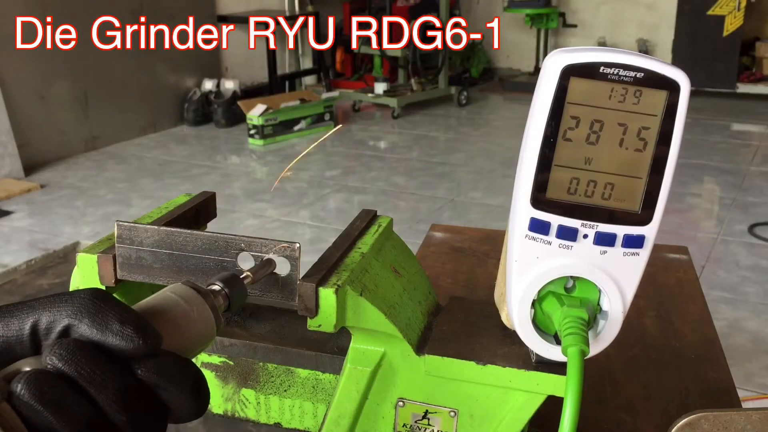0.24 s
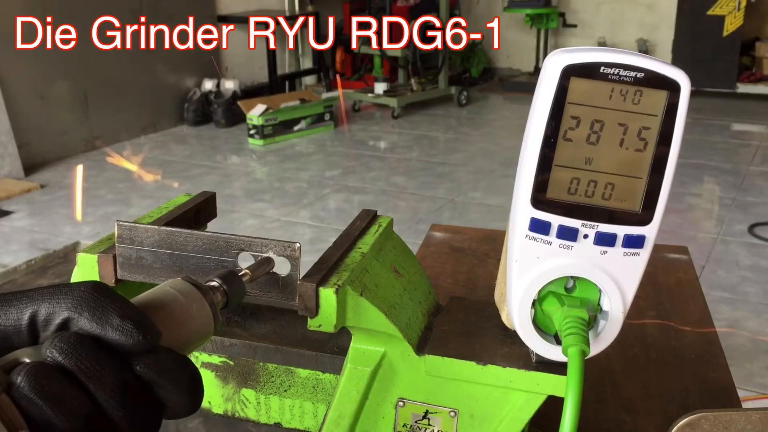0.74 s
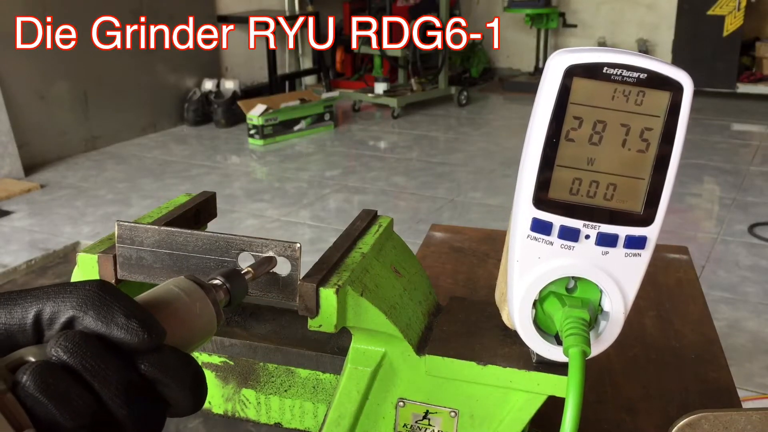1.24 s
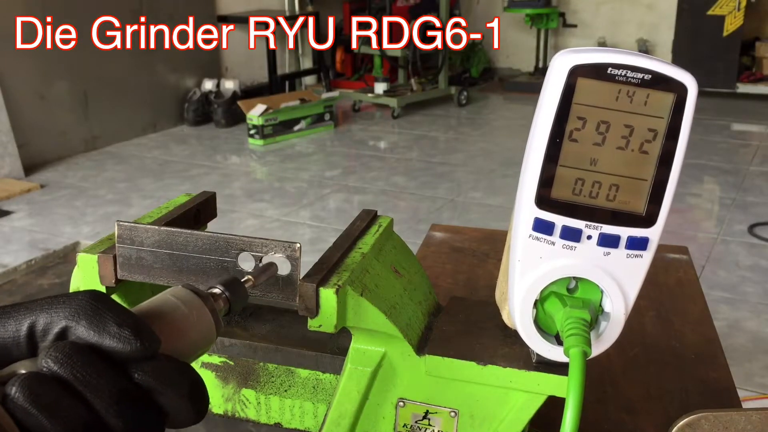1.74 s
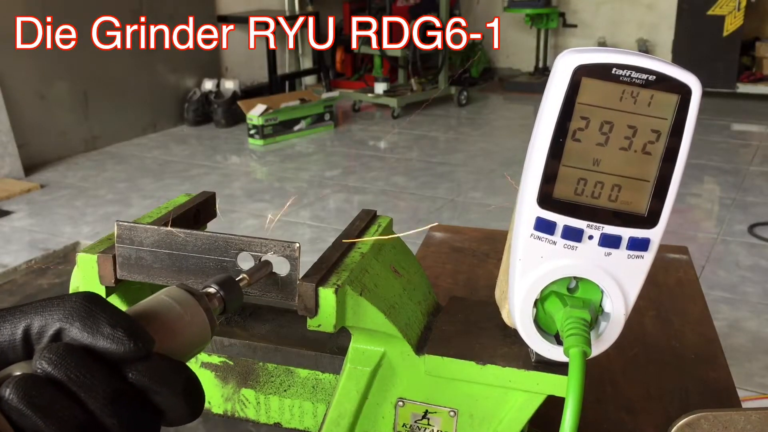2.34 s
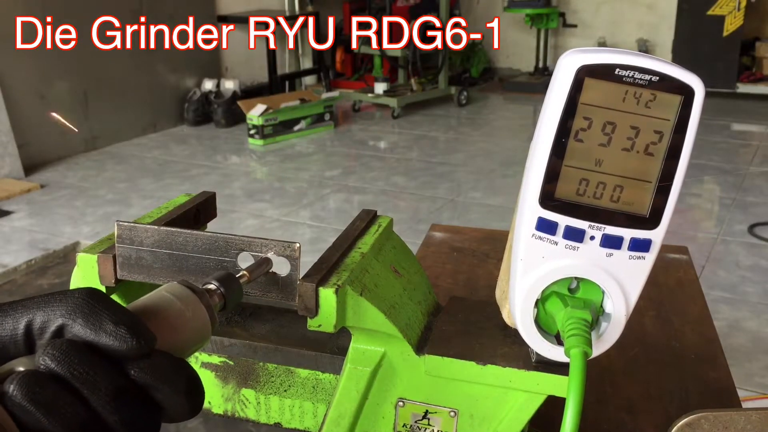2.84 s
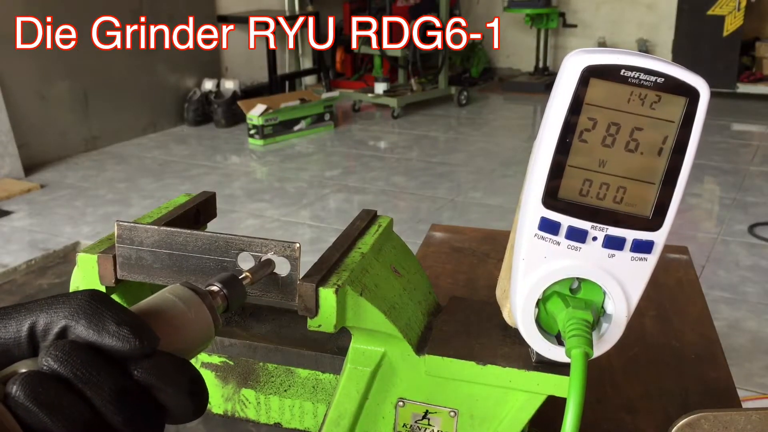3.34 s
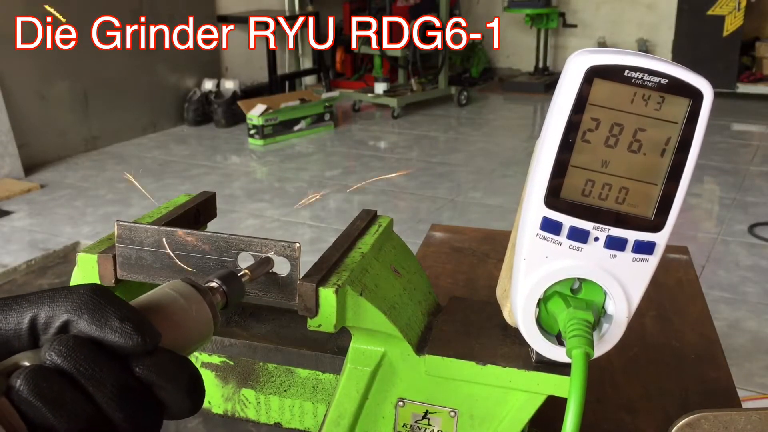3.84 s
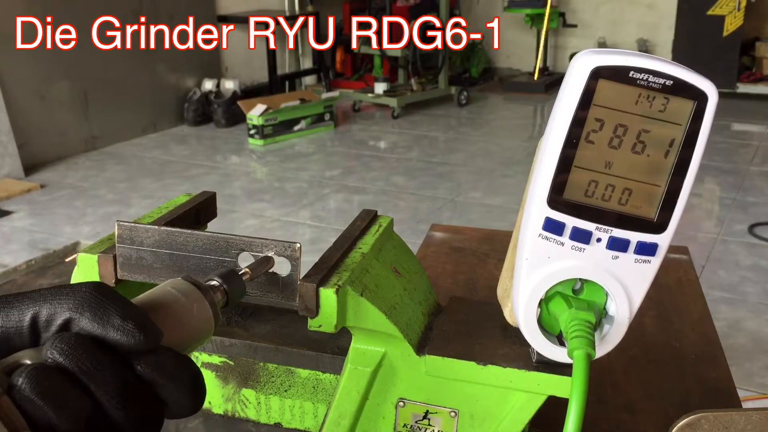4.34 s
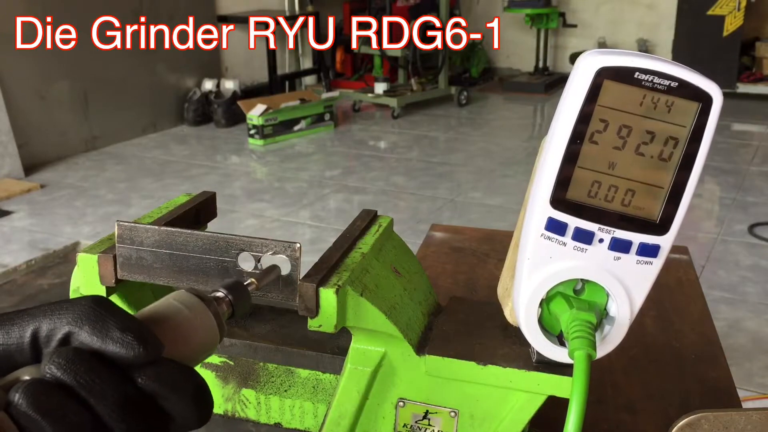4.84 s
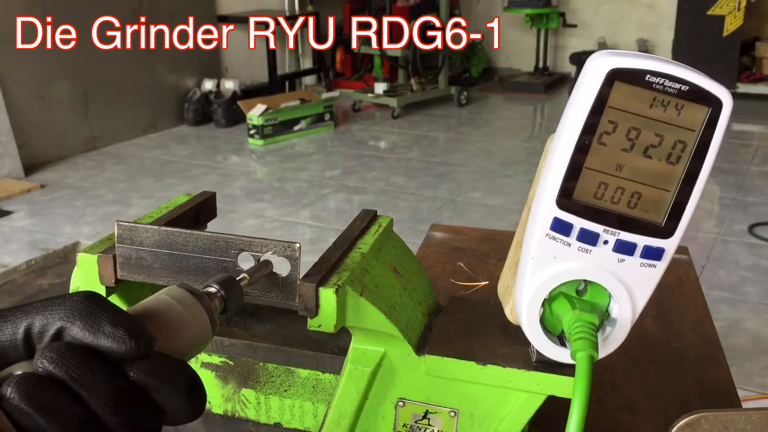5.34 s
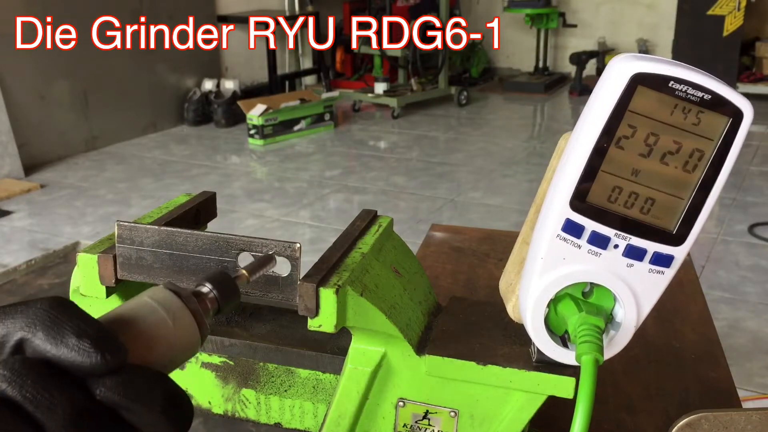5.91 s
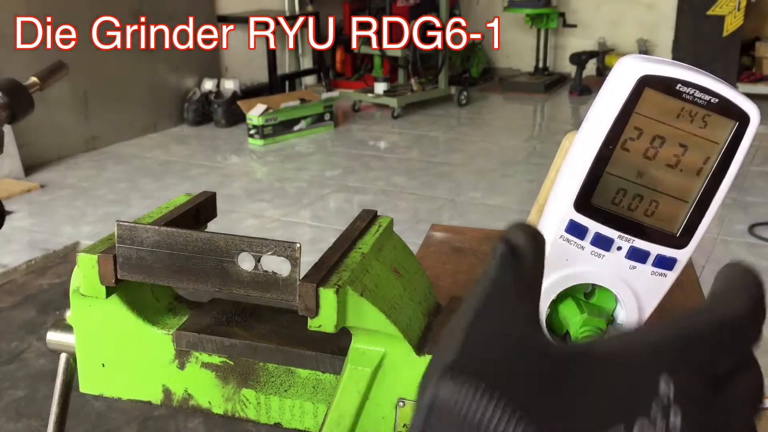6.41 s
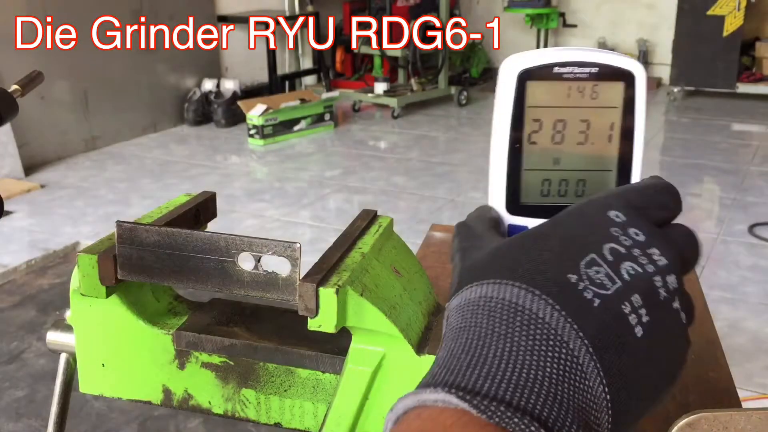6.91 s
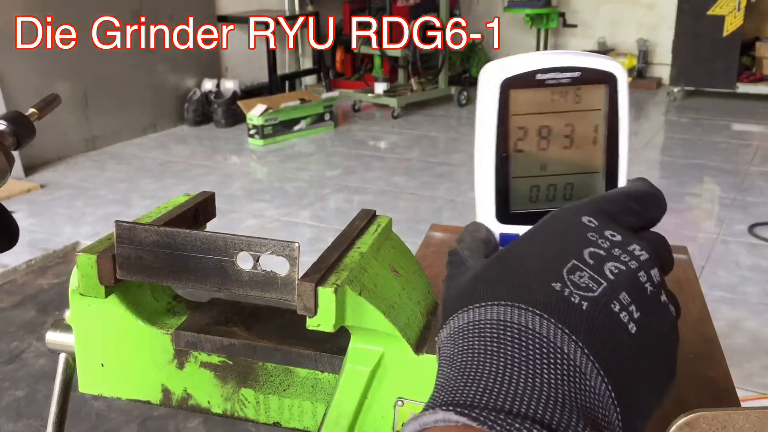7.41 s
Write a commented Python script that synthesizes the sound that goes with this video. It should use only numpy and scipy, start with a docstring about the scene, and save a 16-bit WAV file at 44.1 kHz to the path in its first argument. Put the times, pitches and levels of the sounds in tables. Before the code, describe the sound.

Close in a workshop, an electric die grinder whirs steadily while its burr grinds a steel plate in a vice. Three passes of harsh buzz, gritty hiss and metallic squeal are separated by brief free-running gaps; the pitch sags under pressure and rises when released. After about six seconds it is switched off, and the airy whine glides down, duller and quieter, still turning at the end.

```python
"""Die grinder on steel plate

An electric die grinder bites into a steel plate held in a vice, three times, then is switched off
and coasts down. The rotor hums once a turn, a ball bearing sings beside the shaft's orders and the
fan hisses. The burr knocks the plate every turn, rings its modes with grit, rattles its low modes
and thumps the bench; pressed hard, it whirls round the hole. One microphone."""
import sys
import numpy as np
from scipy import signal
from scipy.fft import rfft, irfft, next_fast_len
from scipy.io import wavfile
from scipy.ndimage import uniform_filter1d, map_coordinates

SR = 44100
rng = np.random.default_rng(int(sys.argv[2]) if len(sys.argv) > 2 else 0)


def wrap_up_sound(samples):
    """Save the sound to the file named by the first command line argument, as 16-bit audio."""
    columns = np.atleast_2d(samples).T
    # keep every value between -1 and 1, then stretch to whole-number steps
    tamed = np.clip(columns, -1, 1)
    steps = np.round(tamed * 32767).astype(np.int16)
    wavfile.write(sys.argv[1], SR, steps)


N = 337806


def amp(db):
    """Decibels to gain."""
    return np.exp(np.asarray(db) * (np.log(10) / 20))


def unit(x):
    """x scaled to rms 1."""
    return x / np.sqrt(np.mean(x ** 2) + 1e-20)


def curves(rows, outside=None):
    """One value per sample for each column after the time."""
    knots_s, *columns = np.transpose(rows)
    return np.array([np.interp(np.arange(N) / SR, knots_s, c, outside, outside) for c in columns])


def passes(tables):
    """Gains of dB tables, one table a contact, silent in between."""
    return sum(amp(curves(rows, outside=-200)) for rows in tables)


def wobble(rate_hz, depth_db=None):
    """Smooth random curve of rate_hz knots; with depth_db, the gain that it gives."""
    coarse = np.arange(0, N + 32, 32)
    knots = rng.standard_normal(int(N * rate_hz / SR) + 4)
    smooth = map_coordinates(knots, [coarse * rate_hz / SR])
    return np.interp(np.arange(N), coarse, smooth if depth_db is None else amp(depth_db * smooth))


def filtered(x, response):
    """x times a complex response of frequency."""
    m = next_fast_len(N + SR // 2)
    return irfft(rfft(x, m) * response(np.fft.rfftfreq(m, 1 / SR)), m)[..., :N]


def coloured(points):
    """Response through (freq_hz, level_db) points on a log axis."""
    freq_hz, level_db = np.transpose(points)
    log_hz = np.log(freq_hz + 1)
    return lambda hz: amp(np.interp(np.log(hz + 1), log_hz, level_db, -120, -120))


def resonant(modes, between_db):
    """Response of modes, alternating in sign, over a flat path."""
    def response(hz):
        total = amp(between_db)
        for k, (mode_hz, width_hz, level_db) in enumerate(modes):
            damping = 1j * hz * width_hz
            total = total + (-1) ** k * amp(level_db) * damping / (mode_hz ** 2 - hz ** 2 + damping)
        return total
    return response


def high_pass(hz, edge_hz):
    """First-order high-pass response."""
    return 1j * hz / (edge_hz + 1j * hz)


def line(multiple, turns, waver_db, rate_hz=12):
    """Sine locked to the shaft angle, its strength wavering at rate_hz knots."""
    cycle = ((multiple * turns + rng.random()) % 1).astype(np.float32)
    return np.sqrt(2) * unit(wobble(rate_hz, waver_db)) * np.sin(np.float32(2 * np.pi) * cycle)


def patchy(x, depth_db, size):
    """x with random gain patches, size = (bands, frames): the hand keeps shifting the tool."""
    z = signal.stft(x, nperseg=512)[2]
    field = uniform_filter1d(rng.standard_normal(z.shape), size[0], 0)
    field = uniform_filter1d(field, size[1], 1)
    return signal.istft(z * amp(depth_db * unit(field)), nperseg=512)[1][:N]


ROOM_DB = -64  # rms
# workshop and microphone hiss: freq_hz, level_db (per Hz)
ROOM_HISS = [(18, -6), (100, -6), (600, -2), (5000, -19), (15700, 9)]


def room():
    """Steady coloured noise of workshop and microphone."""
    return amp(ROOM_DB) * unit(filtered(rng.standard_normal(N), coloured(ROOM_HISS)))


# shaft speed under power, sagging under load: start_s, speed_hz
SHAFT_SPEED = [(0.0, 537.0), (0.22, 540.0), (0.5, 535.5), (1.0, 516.5), (1.25, 512.3), (1.42, 513.5),
               (1.75, 537), (2.0, 550), (2.17, 553), (2.4, 545.5), (2.93, 526.5), (3.45, 539.5),
               (3.65, 537), (4.1, 526), (4.43, 522.3), (4.8, 544.5), (5.05, 555.5), (5.27, 561.3),
               (5.68, 551.8), (6.05, 564), (6.2, 566)]
ROUNDING_S = 0.16
OFF_S, COAST_S, FIRST_DROP, FIRST_DROP_S = 6.115, 3.13, 0.014, 0.13  # FIRST_DROP is a fraction


def shaft():
    """Turns a second: load curve rounded by the rotor's inertia, then an exponential coast."""
    coast_s = np.maximum(np.arange(N) / SR - OFF_S, 0)
    powered = uniform_filter1d(curves(SHAFT_SPEED)[0], int(ROUNDING_S * SR), mode="nearest")
    drop = 1 - FIRST_DROP * (1 - np.exp(-coast_s / FIRST_DROP_S))
    return powered * np.exp(-coast_s / COAST_S) * drop


# tool turned away from the microphone: start_s, away (0-1)
TURNED_AWAY = [(0, 0), (6.2, 0.03), (6.6, 0.49), (7.1, 0.44)]


def turned_away():
    """How far the tool is turned away, 0 to 1."""
    return curves(TURNED_AWAY)[0]


# fan noise facing the microphone: freq_hz, level_db (per Hz)
FAN_NEAR = [(18, -67), (30, -30), (482, -27), (535, -14), (643, -23), (1110, -5), (1240, -7), (1650, -7.5),
            (2510, -9), (2790, -8), (3620, -13), (6440, -6.5), (8160, -13.5), (12100, -9.5), (15700, -16.5)]
# fan noise turned away: freq_hz, level_db (per Hz)
FAN_AWAY = [(18, -55), (30, -4), (325, -21), (391, -12.5), (457, -12), (977, -16), (1140, -9.5),
            (1490, -5.5), (1930, -5.5), (3260, -22), (4130, -6), (6440, -12.5), (7540, -16.5), (9300, 2),
            (15700, -0.5)]
# slow rise of the fan noise before and during the coast: start_s, gain_db
AIR_RISE = [(5.8, -0.5), (6.1, -0.5), (6.25, 1.2), (6.6, 1.5), (7, 2)]
AIR_DB, AIR_POWER, AWAY_LOSS_DB = -35, 2.21, -4.5  # at full speed, growth with speed, loss turned away
NOTCH_HZ, NOTCH_WIDTH_HZ = 7500, 370


def fan_air(pace, turns, away):
    """Turbulent noise that throbs with the turn and dulls as the blades slow."""
    rush = patchy(rng.standard_normal(N), depth_db=2.0, size=(6, 20))
    rush *= (1 + 0.25 * np.sin(2 * np.pi * turns)) * wobble(30, depth_db=0.43)
    near = unit(filtered(rush, coloured(FAN_NEAR)))
    far = unit(filtered(rush, coloured(FAN_AWAY)))
    air = (1 - away) * near + away * far
    treble = filtered(air, lambda hz: 1 / (1 + (10000 / (hz + 1)) ** 8))
    air -= treble * (1 - pace ** 7.2)  # treble fades faster than the rest
    # bench-top reflection cancels this band once the tool is turned away
    band = filtered(air, lambda hz: np.exp(-((hz - NOTCH_HZ) / NOTCH_WIDTH_HZ) ** 2))
    air -= 1.3 * away * band
    level_db = AIR_DB + curves(AIR_RISE)[0] + AWAY_LOSS_DB * away
    return amp(level_db) * pace ** AIR_POWER * air


# rotor unbalance, once a turn: start_s, level_db
ROTOR_HUM = [(0, -45.5), (.7, -47), (1, -40), (1.23, -43), (1.73, -48), (1.94, -44), (2.39, -44.5),
             (2.92, -47), (3.22, -49), (3.39, -45.5), (3.99, -47), (4.31, -43), (4.63, -48.5),
             (4.91, -43.5), (5.2, -44), (5.7, -46), (5.89, -41.5), (6.06, -46.5), (6.17, -42.5),
             (6.31, -47), (6.85, -47.5), (7.21, -53), (7.36, -63), (7.66, -65)]


def rotor_hum(turns, away):
    """Unbalance shakes the housing once a turn."""
    unsteady = amp(1.5 * away * wobble(14))
    return amp(curves(ROTOR_HUM)[0]) * unsteady * line(1, turns, waver_db=0.68)


# motor whine ahead of the housing, one value per order 2 to 7: level_db
WHINE_DB = [-55, -52.5, -47, -54.5, -54, -55]
# power share of the bearing line near each order 2 to 7: share (0-1)
BALL_SHARE = [.75, .35, .5, .7, .6, .5]
# fade and swell of order 4 in the coast: start_s, gain_db
FOURTH_ORDER = [(6.3, -4), (6.6, -7), (6.8, -6), (7.05, 2), (7.3, -20), (7.46, -6), (7.56, 1), (7.64, 4)]
# housing modes: freq_hz, width_hz, level_db
HOUSING_MODES = [(1033, 76, 1), (1143, 33, 8.5), (1374, 75, 6.5), (1570, 100, 7.5), (1990, 146, 1.5),
                 (2505, 90, 7.5), (2782, 53, 5)]
BALL_PASS = 3.06  # balls passing a point of the race per turn
WHINE_POWER = 1.94  # growth with speed


def bearing_whine(pace, turns, away):
    """Shaft orders, each beating with a bearing line 0.06 of the turn rate above, via the housing."""
    whine = 0
    for order, (level_db, share) in enumerate(zip(WHINE_DB, BALL_SHARE), start=2):
        ball = line(BALL_PASS + order - 3, turns, waver_db=4.5)
        whole = line(order, turns, waver_db=0.4)
        if order == 4:
            level_db = level_db + curves(FOURTH_ORDER)[0]
        whine += amp(level_db) * (np.sqrt(1 - share) * whole + np.sqrt(share) * ball)
    housed = filtered(whine, resonant(HOUSING_MODES, between_db=-4))
    return amp(-3 * away) * pace ** WHINE_POWER * housed


# 12 rotor slots: start_s, level_db
ROTOR_SLOTS = [(0, -62), (5.9, -61), (6.15, -55), (6.45, -57), (6.65, -57), (6.8, -68), (7.66, -75)]
# 24 commutator bars: start_s, level_db
COMMUTATOR_BARS = [(6.5, -74), (6.8, -64), (7.2, -67), (7.66, -72)]


def slots_and_bars(turns):
    """Rotor slots and commutator bars each give a line at their count per turn."""
    slots = amp(curves(ROTOR_SLOTS)[0]) * line(12, turns, waver_db=4, rate_hz=25)
    return slots + amp(curves(COMMUTATOR_BARS)[0]) * line(24, turns, waver_db=1.5, rate_hz=27)


MAINS_RIPPLE_HZ = 100


def mains_cycles():
    """Phase of the mains torque ripple in cycles."""
    return MAINS_RIPPLE_HZ * np.arange(N) / SR


# burr strike, one table a pass: start_s, level_db, bright_db (upper orders over the lowest two)
KNOCK_FIRMNESS = [
    [(0, -41.5, -2.5), (.25, -39.5, -4), (.5, -40.5, -2), (.8, -37.5, -1.5), (1.15, -38.5, 0),
     (1.35, -43.5, 11), (1.52, -47.5, 4)],
    [(2.03, -56, 0), (2.15, -41.5, -4), (2.4, -41.5, -6.5), (2.6, -40.5, -6.5), (2.9, -42, 0.5),
     (3.3, -42.5, 1), (3.6, -39, -3.5), (3.95, -42, 0.5), (4.23, -38.5, 4), (4.52, -45.5, 1), (4.6, -57, 9)],
    [(5.16, -53, 0), (5.29, -39, -1.5), (5.55, -41.5, -3.5), (5.69, -49.5, 2.5), (5.8, -66, -2)],
]
# low orders of the knock: multiple, level_db
STRIKE_ORDERS = [(2, 0.5), (3, -1.5), (4, 0), (5, 0), (6, -3.5), (7, 0.5)]
# lines one mains ripple under an order: multiple, level_db
SIDE_LINES = [(8, -1), (10, -4)]
# rough upper lines: multiple, level_db
OVERTONES = [(8, -7.5), (10, -7.5), (11, -6), (12, -11), (12.8, -4), (13, -11)]
# burr shank and vice jaws, lifting orders that glide through: freq_hz, width_hz, level_db
JAW_MODES = [(1097.3, 26.7, 5.5), (1018, 32, 1), (1581, 77, 1), (1696, 38, 3), (2144, 58, -5.5),
             (2228, 41, 4.5), (2697, 25, 2), (2790, 13, 7.5), (3210, 56, -3), (3757, 44, 0),
             (3853, 28, 3.5), (4240, 93, 0), (5430, 49, 6)]
# broad plate mode under the upper lines: freq_hz, width_hz, level_db
SHOULDER_MODE = [(6874, 300, -2)]
OVERTONES_DB = 2


def knock(turns):
    """Burr slightly out of true strikes once a turn; mains torque ripple gives side lines."""
    ripple = mains_cycles()
    firm, bright = passes(KNOCK_FIRMNESS)
    orders = [amp(db) * line(k, turns, waver_db=1.4, rate_hz=8) for k, db in STRIKE_ORDERS]
    tone = sum(orders[:2]) + bright * sum(orders[2:])
    tone *= 1 + 0.24 * np.sin(2 * np.pi * ripple)
    for k, db in SIDE_LINES:
        tone += bright * amp(db) * line(1, k * turns - ripple, waver_db=4, rate_hz=30)
    rough = sum(amp(db) * line(k, turns, waver_db=2, rate_hz=77) for k, db in OVERTONES)
    low = filtered(tone, resonant(JAW_MODES, between_db=-10.5))
    high = amp(OVERTONES_DB) * filtered(rough, resonant(SHOULDER_MODE, between_db=-6.5))
    return firm * (low + high)


# whirl round the hole, one table a bout: start_s, whirl_hz, level_db
WHIRL_BOUTS = [
    [(.95, 105, -75), (1.1, 103, -54), (1.2, 91, -57), (1.26, 102, -47), (1.36, 93, -46), (1.42, 85, -41),
     (1.5, 80, -56), (1.56, 78, -76)],
    [(4.08, 98, -70), (4.15, 96, -49), (4.22, 110, -62), (4.3, 144, -57), (4.37, 117, -48), (4.45, 77, -58),
     (4.52, 90, -59), (4.57, 92, -77)],
]


def whirl(turns):
    """Hard-pressed burr whirls: hum, octave, line under the shaft tone; also returns the beat."""
    sound, beat = 0, 0
    for rows in WHIRL_BOUTS:
        laps = np.cumsum(curves(rows)[0]) / SR
        gain = amp(curves(rows, outside=-200)[1])
        hum = line(1, laps, waver_db=1)
        octave = amp(-13) * line(2, laps, waver_db=3)
        under_shaft = amp(-10.5) * line(1, turns - laps, waver_db=4)
        sound += gain * (hum + octave + under_shaft)
        beat += np.sqrt(gain / gain.max()) * np.sin(2 * np.pi * laps)
    return sound, beat


# hard catches: start_s, level_db
JOLT_TIMES = [(0.179, -24), (0.998, -17), (1.225, -19), (1.256, -26), (1.277, -30), (1.349, -9),
              (2.148, -36), (2.569, -27), (5.129, -32)]


def jolts():
    """Burr catches an edge: short dull kick of two decaying sines."""
    out, t = np.zeros(N + SR), np.arange(SR // 20) / SR
    low = 0.64 * np.sin(2 * np.pi * 190 * t) * amp(-60 * t / 0.0077)  # 60 dB down in 7.7 ms
    high = np.sin(2 * np.pi * 900 * t) * amp(-60 * t / 0.0038)
    for start_s, level_db in JOLT_TIMES:
        out[round(start_s * SR):][:len(t)] += amp(level_db - 7.5) * (low + high)
    return out[:N]


# burr digs in briefly: centre_s, gain_db
BITE_TIMES = [(.19, 4.5), (.476, 1.5), (.866, 2.5), (.994, 4.5), (1.112, 3.5), (1.252, 3.5), (1.36, 2.5),
              (2.57, 3), (3.11, 2.5), (3.18, 5), (3.38, 1.5), (3.86, 1.5), (4.15, 1.5), (4.3, 1.5),
              (4.45, 0), (5.124, 9.5), (5.376, 5)]
BITE_S = 0.014


def bites():
    """Gain of the short digs, each a bell-shaped swell in dB."""
    t = np.arange(0, N + 32, 32) / SR
    gain_db = sum(db * np.exp(-((t - centre_s) / BITE_S) ** 2) for centre_s, db in BITE_TIMES)
    return amp(curves(np.transpose([t, gain_db]))[0])


def grit(turns, beat, flutter_db, pulse):
    """Grains torn off the steel: noise gated by the turn and slower beats, contact unsteady."""
    gate = np.exp(pulse * np.cos(2 * np.pi * turns) + beat)
    return rng.standard_normal(N) * gate * amp(flutter_db * (wobble(24.77) + wobble(70)))


# upper plate modes: freq_hz, width_hz, light_cut_db, heavy_cut_db
PLATE_UPPER = [(8790, 80, -8, -8), (8950, 60, 1.5, 1), (9120, 80, -5, -14), (9430, 58, -10, -10),
               (9940, 40, -4, -2), (10850, 100, -6.5, -6), (11130, 70, -9, -9), (11880, 100, -5, 2),
               (12440, 80, -8, -8), (14260, 140, -2, -8), (14500, 170, -16, -3), (15450, 170, -7.5, -7.5)]
# level of grit over rattle: start_s, gain_db
GRIT_TREBLE = [(0, 1.5), (.4, -0.5), (.9, 0.5), (1.4, -0.5), (2.1, -0.5), (2.4, 2.5), (2.9, -0.5),
               (3.2, -2), (3.5, 3.5), (3.9, 0), (4.3, 0.5), (5.2, 1.5), (5.5, 2.5), (5.75, -5)]
HEAVY_DB, HEAVY_STEEP = -30, 8.6  # pressure where the cut turns heavy, steepness of the change
GRIT_DB = -1


def plate_grit(scratch, pressure):
    """Grit rings the upper modes, crossfading from light to heavy cut with pressure."""
    def upper(column):
        modes = resonant(np.array(PLATE_UPPER)[:, [0, 1, column]], between_db=-28)
        return unit(filtered(scratch, lambda hz: modes(hz) * high_pass(hz, 6300) ** 2))
    heavy = 1 / (1 + (amp(HEAVY_DB) / (pressure + 1e-9)) ** HEAVY_STEEP)
    ringing = (1 - heavy) * upper(column=2) + heavy * upper(column=3)
    return pressure * amp(GRIT_DB + curves(GRIT_TREBLE)[0]) * ringing


# lower plate modes: freq_hz, width_hz, level_db
PLATE_LOWER = [(1560, 35, -2), (2240, 45, -2), (2570, 50, -4), (3110, 66, -10), (3470, 42, -3),
               (3980, 130, -7), (4155, 42, -1), (4710, 84, -14), (5280, 70, -7)]


def plate_rattle(bounce, pressure):
    """Bouncing contact rattles the lower modes."""
    modes = resonant(PLATE_LOWER, between_db=-15)
    band = lambda hz: modes(hz) * high_pass(hz, 1060) ** 2 * (1 - high_pass(hz, 5000))
    return pressure * amp(-5.5) * unit(filtered(bounce, band))


# strongest plate mode and neighbours: freq_hz, width_hz, level_db
SQUEAL_MODES = [(6642, 12, 0), (6715, 40, -11), (6860, 110, -17)]


def plate_squeal(turns, squeal):
    """Fluttering grit rings the plate's strongest mode."""
    ripple = np.sin(2 * np.pi * mains_cycles())
    source = grit(turns, 0.031 * ripple, flutter_db=1.2, pulse=0.055)
    ring = unit(filtered(source, resonant(SQUEAL_MODES, between_db=-60.5)))
    return squeal * wobble(12, depth_db=1.0) * ring


# rasp spectrum: freq_hz, level_db (per Hz)
RASP_COLOUR = [(900, -10), (1800, -7), (3000, -3), (3800, 1.5), (4800, -5), (7000, -33)]
RASP_DB, RASP_FROM_DB, RASP_GROWS = -40, -31, 1.2  # level at that pressure, growth with pressure


def rasp(scratch, pressure):
    """Broad noise that grows faster than the pressure."""
    gain = amp(RASP_DB) * (pressure / amp(RASP_FROM_DB)) ** RASP_GROWS
    return gain * unit(filtered(scratch, coloured(RASP_COLOUR)))


# thin ring under light cuts, one table a pass: start_s, level_db
SING_LEVEL = [
    [(0, -38.5), (.45, -46), (.6, -58), (1.5, -60)],
    [(2.05, -55), (2.2, -50), (2.65, -43.5), (2.9, -52), (3.25, -45), (3.55, -41.5), (3.85, -43),
     (4.0, -56), (4.55, -58)],
]
# its mode: freq_hz, width_hz, level_db
SING_MODE = [(5366, 30, -5)]


def thin_ring(scratch):
    """Grit rings one narrow mode."""
    return passes(SING_LEVEL)[0] * unit(filtered(scratch, resonant(SING_MODE, between_db=-60)))


# vice and bench modes: freq_hz, width_hz, level_db
BENCH_MODES = [(58.5, 51, -3), (113, 72, -3), (194, 52, -5.5), (308, 235, -12)]
# how freely the bench thumps: start_s, gain_db
BENCH_FREEDOM = [(0, 6), (.6, -1.5), (1.3, 1.5), (2.1, 2), (2.6, -2), (3, -4), (3.5, 10), (3.95, -4),
                 (4.4, 3), (5.1, 0), (5.45, 8.5), (5.8, -6)]
THUD_DB, THUD_FROM_DB, THUD_GROWS = -66, -34.5, 2.15  # level at that pressure, growth with pressure


def bench_thud(bounce, pressure):
    """Bouncing thumps vice and bench, growing faster than the pressure."""
    level = amp(THUD_DB + curves(BENCH_FREEDOM)[0] + 2.8 * wobble(14))
    thud = level * (pressure / amp(THUD_FROM_DB)) ** THUD_GROWS
    return thud * unit(filtered(bounce, resonant(BENCH_MODES, between_db=-57)))


# one table a contact: start_s, pressure_db, squeal_db
CUT_PRESSURE = [
    [(0, -32, -27.5), (.1, -33.5, -36.5), (.3, -33.5, -32.5), (.42, -34.5, -35.5), (.7, -33, -36),
     (.86, -29, -33), (1.1, -29, -31), (1.28, -26.5, -31), (1.38, -28, -23), (1.46, -29.5, -33),
     (1.55, -41, -35), (1.63, -40, -52)],
    [(1.94, -46, -54), (1.963, -39, -38), (2.0, -49, -48)],
    [(2.04, -40, -43), (2.12, -30.5, -28), (2.25, -36, -36), (2.42, -37, -43.5), (2.6, -34.5, -42),
     (2.78, -36, -37), (2.95, -34, -32), (3.14, -36, -39.5), (3.38, -34, -34.5), (3.81, -35.5, -33),
     (4.05, -30.5, -33), (4.18, -28.5, -30), (4.33, -28, -23.5), (4.46, -29.5, -30), (4.56, -36.5, -34),
     (4.66, -62, -49)],
    [(5.11, -45, -50), (5.16, -39.5, -47), (5.29, -35, -35), (5.4, -36.5, -34.5), (5.55, -35, -29.5),
     (5.75, -35.5, -37.5), (5.86, -46, -53)],
]


def plate(turns, beat):
    """Burr on steel: gritty contacts, set by pressure and digs, drive plate and bench."""
    pressure, squeal = passes(CUT_PRESSURE) * bites()
    ripple = np.sin(2 * np.pi * mains_cycles())
    scratch = grit(turns, 0.17 * ripple + 0.3 * beat, flutter_db=0.3, pulse=0.29)
    scratch = patchy(scratch, depth_db=1.0, size=(6, 30))
    bounce = grit(turns, 0.12 * ripple + 0.5 * beat, flutter_db=1.45, pulse=0.32)
    bounce = patchy(bounce, depth_db=2, size=(4, 30))
    sound = plate_grit(scratch, pressure) + plate_rattle(bounce, pressure)
    sound += plate_squeal(turns, squeal) + rasp(scratch, pressure) + thin_ring(scratch)
    return sound + bench_thud(bounce, pressure)


def scene():
    """Room hiss plus the tool, its turning parts all locked to one shaft."""
    speed = shaft()
    pace = speed / speed.max()
    turns = np.cumsum(speed) / SR
    away = turned_away()
    whirl_hum, beat = whirl(turns)
    mono = room() + fan_air(pace, turns, away)
    mono += rotor_hum(turns, away) + bearing_whine(pace, turns, away) + slots_and_bars(turns)
    mono += knock(turns) + whirl_hum + jolts() + plate(turns, beat)
    return np.array([mono, mono])


MIC_LOW_HZ, TOP_HZ = 48.4, 15750


def record(dry):
    """Microphone rolls off the deep bass; nothing is kept from the band limit up."""
    return filtered(dry, lambda hz: high_pass(hz, MIC_LOW_HZ) ** 2 * (hz < TOP_HZ))


dry = scene()
out = record(dry)
wrap_up_sound(out)
```